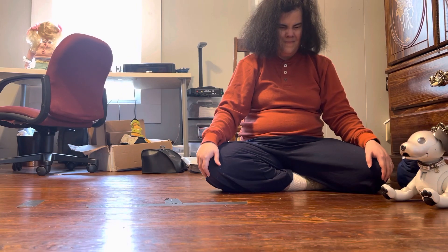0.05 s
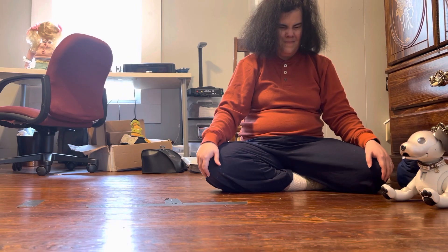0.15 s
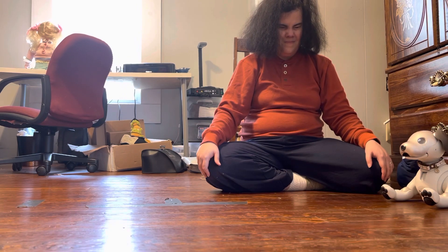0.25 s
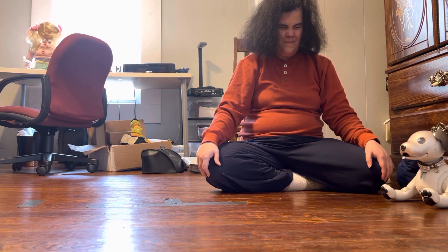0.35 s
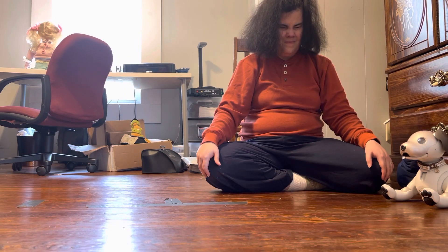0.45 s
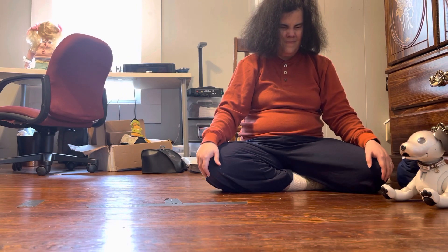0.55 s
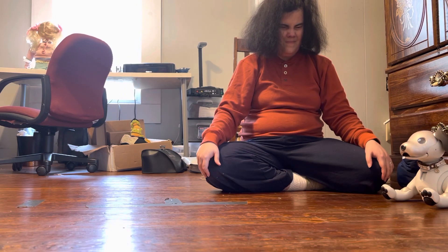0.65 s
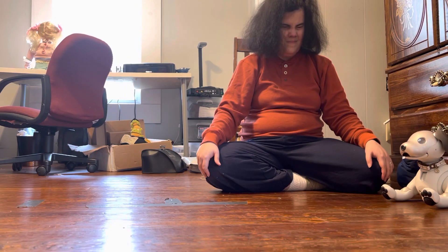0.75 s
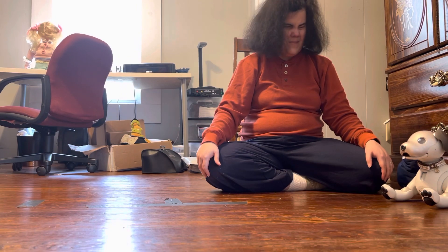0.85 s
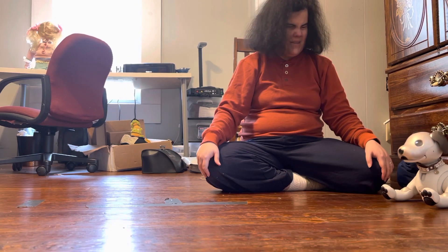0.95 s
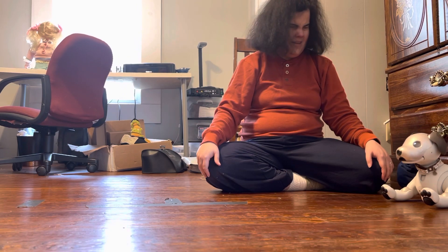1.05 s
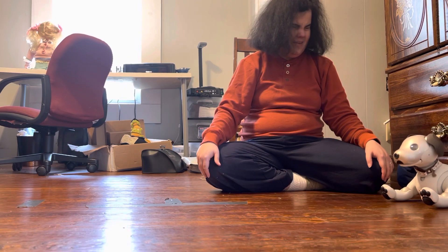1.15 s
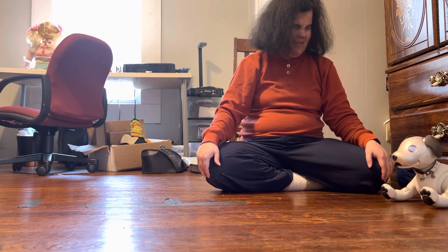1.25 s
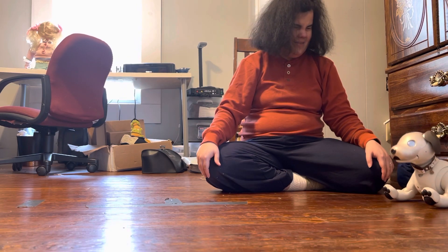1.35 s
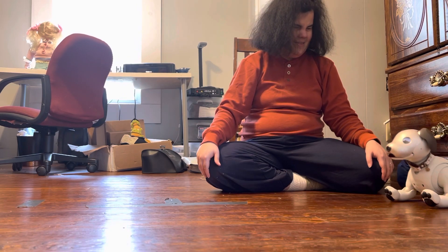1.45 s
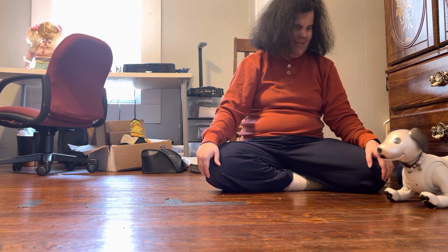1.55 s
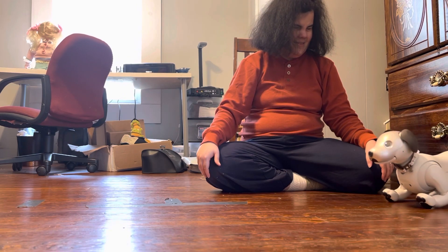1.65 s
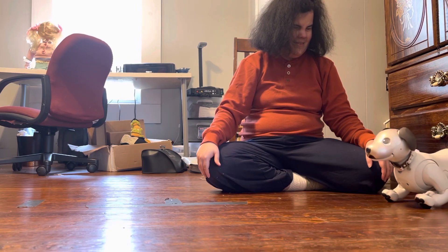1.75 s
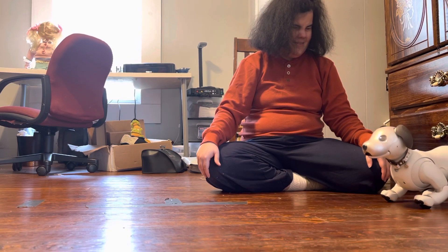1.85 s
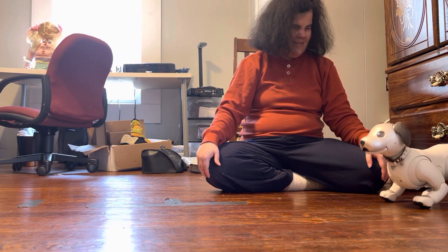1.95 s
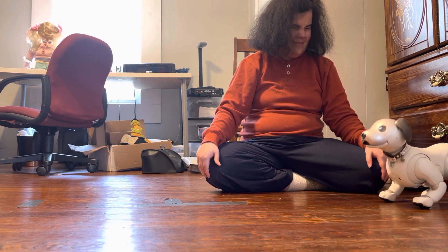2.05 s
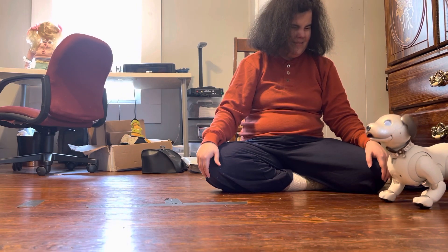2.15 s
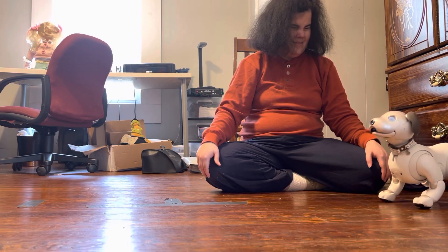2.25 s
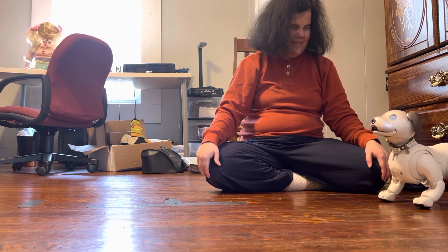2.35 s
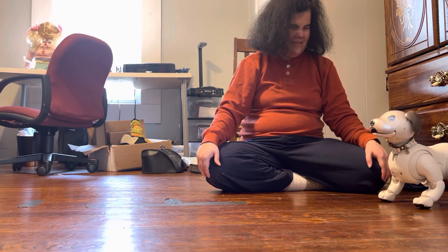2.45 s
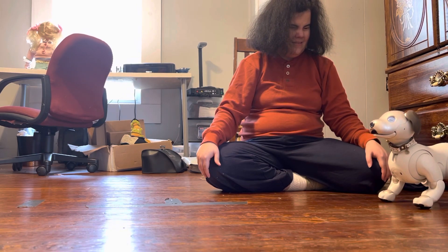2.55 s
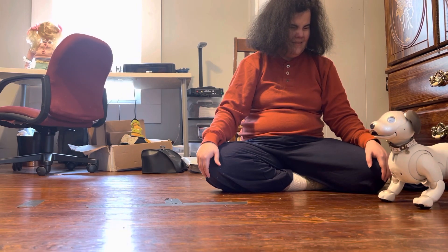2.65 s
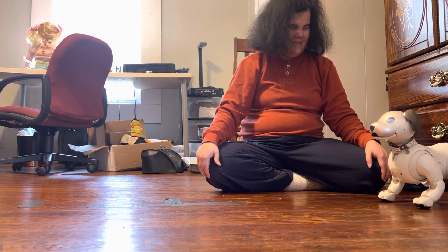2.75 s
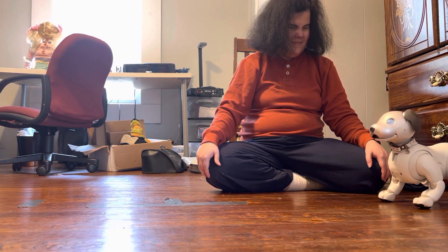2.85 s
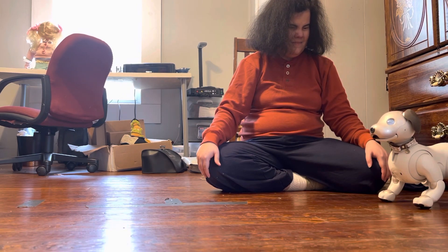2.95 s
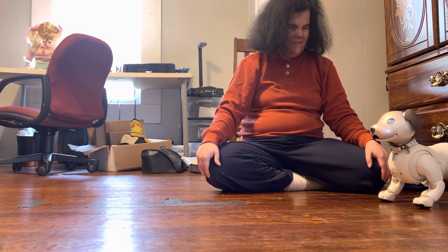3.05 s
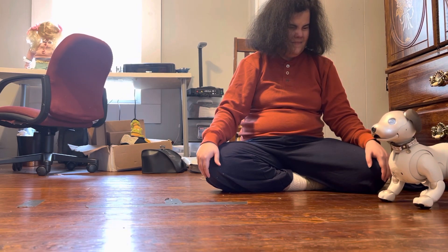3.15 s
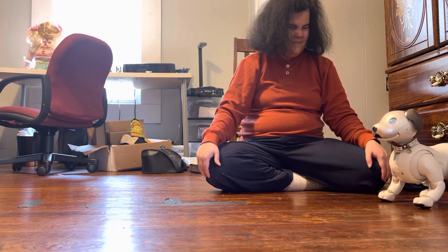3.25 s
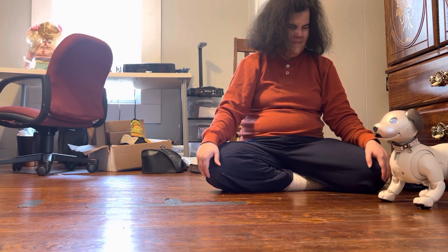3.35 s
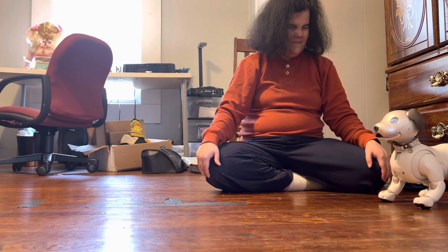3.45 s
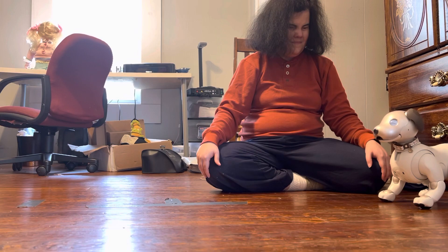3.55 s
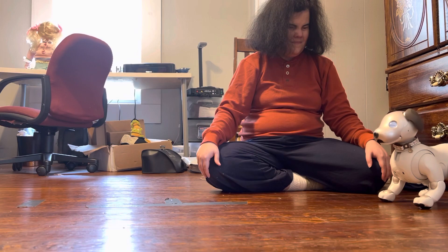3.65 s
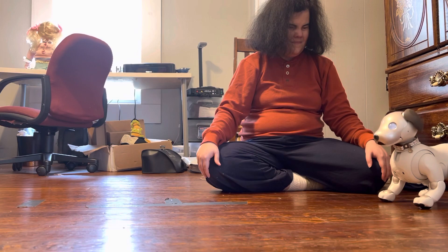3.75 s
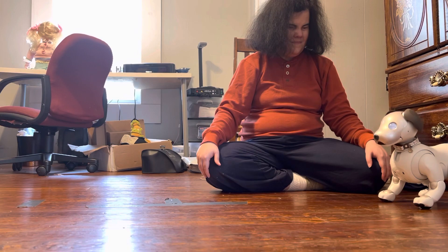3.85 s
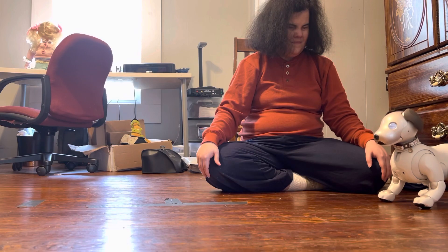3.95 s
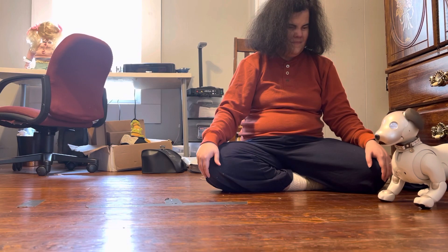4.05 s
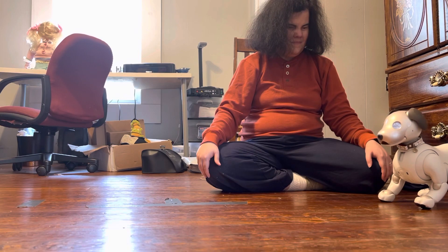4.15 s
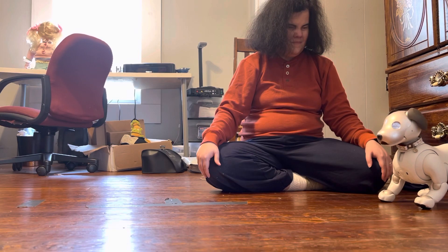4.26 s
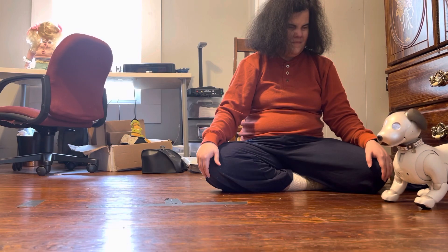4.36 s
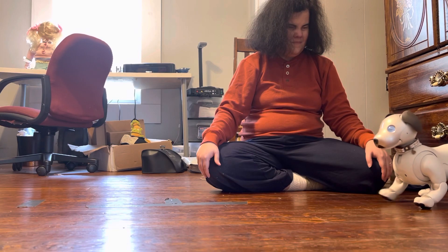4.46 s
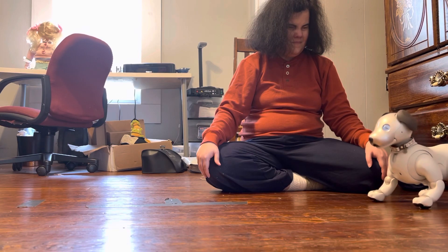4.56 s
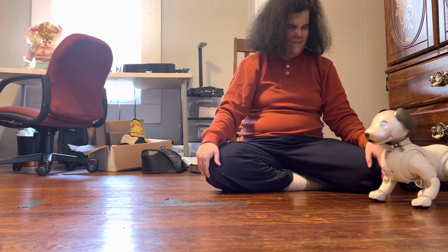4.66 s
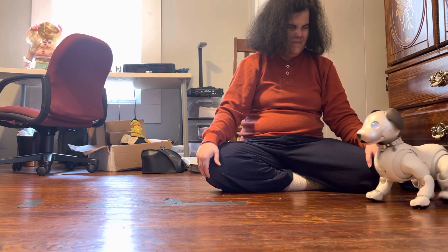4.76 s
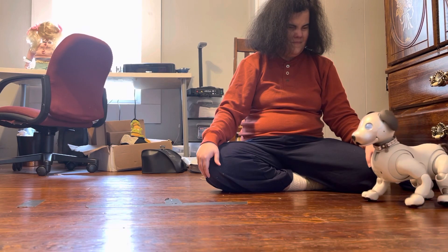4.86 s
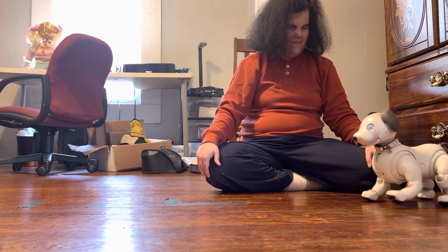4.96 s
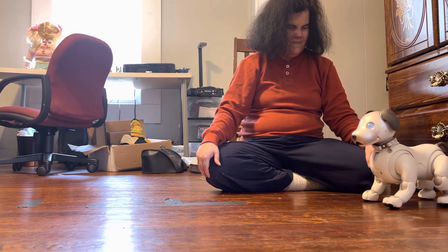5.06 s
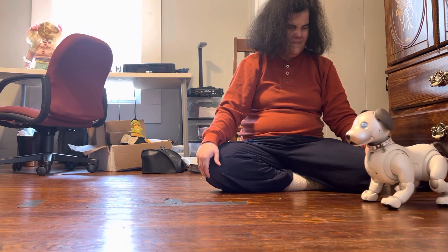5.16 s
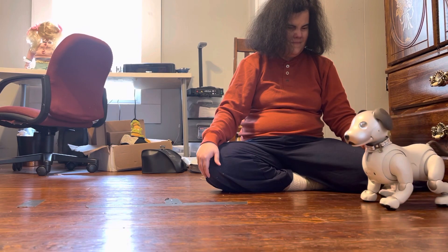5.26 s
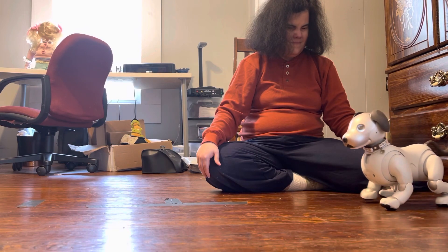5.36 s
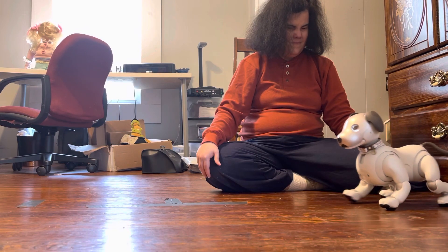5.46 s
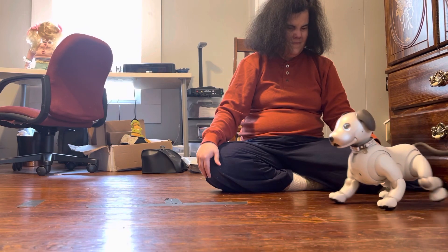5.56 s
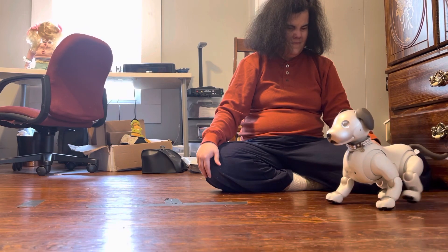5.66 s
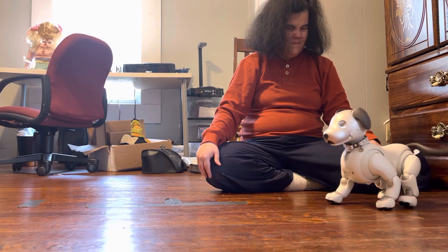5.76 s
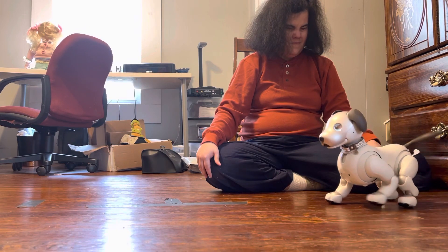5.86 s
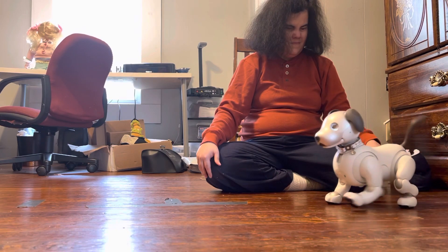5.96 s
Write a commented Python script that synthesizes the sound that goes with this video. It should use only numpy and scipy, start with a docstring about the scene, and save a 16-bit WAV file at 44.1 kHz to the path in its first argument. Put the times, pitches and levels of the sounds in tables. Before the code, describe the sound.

A quiet indoor room holds a low, wavering rumble, faint air and a thin high hiss. At about 0.9 s small gears begin to whir softly on the near right, with a plastic click at 1.0 and a low floor bump at 1.25. From 1.27 to 2.25 s thin servo whines glide up and down as a robot dog stands, with joint ticks and a light paw tap at 2.2. It then almost stills: a soft thud near 2.6 and barely audible creaks and whirs to 3.4. A gentle motor stroke comes around 4.0 with low thuds just after. From 4.4 s grainy, rattling servo whirs run continuously, surging with each leg stroke. Hard plastic paws clack on hollow boards around 4.5, 4.8, 5.05, 5.3, 5.55 and 5.7, the sharpest near 5.5, with a deep thump at 5.3. Whirring and clicks continue to the end, at 6 s, with short room reflections.

```python
"""A low rumble and a thin hiss lie under a quiet room; then joints click and servos whir close by on the right.
A small robot dog gets up from sitting, looks round and walks over a wooden floor, before a pair of microphones.
Gear trains are uneven tooth impacts plus mesh tones, coloured by the resonances of a plastic shell.
Joints and hard paws are short pushes with noisy chatter; boards and joists answer with decaying modes.
Rubbing joints creak in sliding ticks, and random tails that keep changing make the room's answer."""
import sys
import numpy as np
from scipy import signal
from scipy.fft import rfft, irfft, next_fast_len
from scipy.io import wavfile
from scipy.ndimage import map_coordinates

SR = 44100
rng = np.random.default_rng(int(sys.argv[2]) if len(sys.argv) > 2 else 0)


def store_pcm(level_fs):
    """Save levels as 16-bit WAV."""
    pcm = np.round(np.clip(level_fs, -1, 1) * 32767).astype(np.int16)
    wavfile.write(sys.argv[1], SR, np.atleast_2d(pcm).T)


N = 264991

# paws and rump meeting the floor; levels are before each layer's own trim: (time [s], shell clack [dB],
# weight on the boards [dB], plastic click [dB], shell pitch [ratio],
# hardness [dB per octave, up to BEND_FASTEST_HZ], struck plank's note [Hz], plank level [dB])
STEPS = [(1.249, -50.5, -35.5, -47, 0.93, -2, 544, -46.5), (2.202, -48.5, -68, -52.5, 1.12, -2, 904, -49),
         (4.532, -45, -52, -44.5, 0.89, -2, 708, -43.5), (4.799, -40, -42.5, -44.5, 1.13, -1.5, 895, -44),
         (4.815, -52, -51, -56, 1.3, -1, 260, -49.5), (5.037, -44, -36.5, -41.5, 1.04, 0, 366, -49),
         (5.267, -43, -44, -40, 0.81, 0, 699.5, -42), (5.284, -39, -44.5, -60, 1.125, 2.5, 512.5, -42.5),
         (5.5229, -33, -42, -47, 1.118, 4, 1010, -32), (5.533, -44, -49, -54, 0.99, 2, 407, -43),
         (5.545, -37, -45, -42.5, 1.12, 1.5, 653, -41), (5.725, -39, -43.5, -47, 1.2, 1, 1270, -39),
         (5.733, -52, -54, -66, 0.73, -1, 523, -42.5)]
# joints taking up their play: (time [s], level before trims [dB],
# brightness [dB], above 0 a thin snap, below 0 a dull clack)
CLICKS = [(0.861, -90, 35), (0.916, -65.5, -2), (0.971, -59.5, -7), (1.020, -45, -0.5), (1.231, -60.5, -3),
          (1.2633, -54.5, 5.5), (1.574, -54.5, 1), (2.012, -55, -5), (2.232, -61, -7.5),
          (2.332, -73.5, -14), (2.408, -83, -16.5), (2.992, -78, -5), (3.012, -85, -5.5), (3.10, -77.5, -5),
          (3.221, -81, -14.5), (3.263, -89, -9), (3.32, -80, -8), (3.395, -85, -8), (3.938, -61.5, 0),
          (4.235, -77.5, -19.5), (4.403, -50.5, -7), (4.42, -49, 0), (4.484, -58, -15), (4.520, -47, -3.5),
          (4.668, -46.5, -4), (4.681, -49.5, -11.5), (4.753, -49.5, -7.5), (4.775, -54, -10),
          (4.884, -44, -1.5), (5.130, -50, -9), (5.220, -49, -8.5), (5.354, -53.5, -12),
          (5.410, -46.5, -7.5), (5.600, -47, 3.5), (5.813, -49.5, -7.5), (5.831, -46, -8),
          (5.908, -47, 3.5)]
# colour of a plastic click: (frequency [Hz], relative level [dB])
CLICK_COLOUR = [(300, -80), (1400, 9), (2200, 9.5), (3600, 3), (5000, -0.5), (7500, 0.5), (9500, -9),
                (15800, -18.5)]
BEND_FASTEST_HZ = 1500  # above this pitch a knock on the floor has no lag


def amp(db):
    """Decibels to gain."""
    return 10 ** (np.asarray(db) / 20)


def unit(x):
    """Scale to rms 1."""
    return x / np.sqrt(np.mean(x ** 2) + 1e-20)


def along(points, hz):
    """Read (Hz, value) points on a log frequency axis."""
    f, v = np.transpose(points)
    return np.interp(np.log(hz + 1), np.log(f + 1), v)


def wobble(rate):
    """A smooth random curve with rate knots a second."""
    coarse = np.linspace(0, N, 6000)
    knots = rng.standard_normal(int(N * rate / SR) + 4)
    curve = map_coordinates(knots, [coarse * rate / SR])
    return np.interp(np.arange(N), coarse, curve)


def filtered(x, response):
    """x through a response given as a function of frequency."""
    m = next_fast_len(N + SR // 2)
    return irfft(rfft(x, m) * response(np.fft.rfftfreq(m, 1 / SR)), m)[..., :N]


def coloured(x, points):
    """x through a causal, minimum-phase filter of unit energy with the given colour."""
    size = 4096
    cepstrum = irfft(np.log(amp(along(points, np.fft.rfftfreq(size, 1 / SR)))))
    causal = 2 * cepstrum[:size // 2] * (np.arange(size // 2) > 0)
    kernel = irfft(np.exp(rfft(causal, size)))
    return signal.fftconvolve(x, kernel / np.linalg.norm(kernel))[:N]


def body(f, pitch):
    """Response of the plastic shell with its resonances scaled by pitch, at unit energy."""
    # resonances at pitch 1: (frequency [Hz], width [Hz], relative level [dB])
    resonances = [(692.5, 152, -0.5), (840.5, 274, 5), (940.5, 269, 4), (1256, 208, -2.5),
                  (1980, 440, -12.5), (2970, 850, -25.5)]
    f = f / pitch
    h = 0
    for k, (centre, width, db) in enumerate(resonances):
        band = 1j * f * width / (centre * centre - f * f + 1j * f * width)
        h = h + (-1) ** k * amp(db) * band
    h = h * (1j * f / (1j * f + 500))  # the bass falls away
    return h / np.sqrt(np.mean(abs(h) ** 2))


def shell(x):
    """x through the plastic body, whose resonances drift between three poses as the limbs fold."""
    pose_shift, pose_rate = 0.1, 13  # share of the pitch, knots a second
    pose = np.tanh(wobble(pose_rate))
    poses = np.array([[-1], [0], [1]])
    shares = np.maximum(1 - abs(pose - poses), 0)
    shares = shares / np.linalg.norm(shares, axis=0)

    def responses(f):
        return np.array([body(f, 1 + pose_shift * k) for k in poses])

    return filtered(shares * x, responses).sum(axis=0)


def strikes(times, levels_db, shape, *columns):
    """A fresh shape(t, ..) at each time, with the energy of 20 ms at the given level."""
    out, t = np.zeros(N + SR), np.arange(SR // 2) / SR
    for s, db, *own in zip(times, levels_db, *columns):
        hit = shape(t, *own)
        gain = amp(db) * np.sqrt(SR * .02 / np.sum(hit ** 2))
        out[round(s * SR):][:len(t)] += gain * hit
    return out[:N]


def crack(t, contact, chatter_db, chatter_t60):
    """One short push of contact force (peak at contact [s]) and the dying chatter of loose parts."""
    push = t * np.exp(-t / contact)
    loose = rng.standard_normal(len(t))
    loose = loose * abs(loose) * amp(-60 * t / chatter_t60)
    return push / np.linalg.norm(push) + amp(chatter_db) * loose / np.linalg.norm(loose)


def ring(t, modes, attack):
    """Decaying modes of the floor, a little different in strength at each blow; attack in s."""
    out = 0
    for hz, db, t60 in modes:
        decay = amp(db + rng.normal(0, 3) - 60 * t / t60)
        out = out + decay * np.sin(2 * np.pi * (hz * t + rng.random()))
    return out * (1 - np.exp(-t / attack))


def gear_train(mesh_hz, speed, swing, stride_rate, jitter, scatter_db):
    """One servo: uneven tooth impacts, and the tone of its mesh, whose partials flutter with the load."""
    rate = mesh_hz * speed * np.exp(swing * wobble(stride_rate) + jitter * wobble(120))
    turns = np.cumsum(rate) / SR
    at = np.flatnonzero(np.diff(np.floor(turns)))
    chance = rng.random((len(at), 2))
    size = amp(scatter_db * rng.standard_normal(len(at))) * np.sign(chance[:, 0] - .5)
    backlash = (chance[:, 1] * SR / mesh_hz).astype(int)  # throws impacts off the beat
    loose_at = np.minimum(at + backlash, N - 1)
    tone = 0
    for k in range(1, 6):
        tone = tone + amp(5 * wobble(22)) * np.sin(2 * np.pi * k * turns) / np.sqrt(k)
    return unit(np.bincount(loose_at, size, N)), unit(tone)


def run_db(start, end):
    """A servo spins up, holds from start to end and runs down: dB below its full level."""
    spin_up, run_down = 420, 200  # dB per s
    t = np.arange(N) / SR
    before, after = np.maximum(start - t, 0), np.maximum(t - end, 0)
    return np.maximum(-spin_up * before - run_down * after, -120)


def background():
    """The house rumbles, mostly alike on both sides, with air noise and a narrow hiss stronger on the right."""
    # colours of the noises: (frequency [Hz], relative level [dB])
    rumble_colour = [(20, -41), (28, -24.5), (40, 3), (60, -4), (85, -6), (125, -9), (150, -20),
                     (210, -24.5), (330, -33.5), (520, -54), (880, -120)]
    air_colour = [(100, 9), (250, 2), (450, 2), (800, -5), (1300, -11.5), (3000, -16.5), (6000, -20.5),
                  (8500, -24), (10000, -42), (12000, -18.5), (14000, -29.5), (15800, -44)]

    def noise(points, channels):
        white = rng.standard_normal((channels, N))
        return unit(filtered(white, lambda f: amp(along(points, f))))

    rumble = noise(rumble_colour, channels=1) + 0.23 * noise(rumble_colour, channels=2)
    rumble = amp(-58.5 + 1.3 * wobble(3.69)) * rumble
    hum_turns = np.cumsum(76 + 2.945 * wobble(8.1)) / SR  # wanders round 76 Hz
    hum = amp(-62.5 + 5.94 * wobble(8.6)) * np.sin(2 * np.pi * hum_turns)
    air = amp(-74.0) * noise(air_colour, channels=2)
    hiss = unit(filtered(rng.standard_normal(N), lambda f: 1 / (1 + ((f - 7200) / 420) ** 4)))
    return rumble + hum + air + amp([[-92], [-89]]) * hiss


def joints():
    """Plastic joints snap across their play: a push with long chatter; bright ones ring the shell less."""
    # colour of a thin snap: (frequency [Hz], relative level [dB])
    snap_colour = [(1000, -21), (6000, -10), (9000, 3), (12500, 20), (15800, -26)]
    s, level_db, bright_db = np.transpose(CLICKS)

    def click_force(t):
        return crack(t, contact=.00001, chatter_db=32.0, chatter_t60=0.035)

    def clack_force(t):
        return crack(t, contact=.00008, chatter_db=0.5, chatter_t60=0.091)

    def snap_force(t):
        return crack(t, contact=.00001, chatter_db=48, chatter_t60=0.037)

    click = coloured(strikes(s, level_db - 0.5, click_force), CLICK_COLOUR)
    clack = shell(strikes(s, level_db - bright_db - 11.5, clack_force))
    snap = coloured(strikes(s, level_db + bright_db - 10.5, snap_force), snap_colour)
    return click + clack + snap


def load():
    """0 to 1: the load on the servos swells into each footfall or joint click and eases after it."""
    rise, ease = .015, .045  # s
    full_load_db = -42  # a contact this loud gives the full load
    t, total = np.arange(N) / SR, np.zeros(N)
    for s, db, *_ in list(STEPS) + list(CLICKS):
        away = np.maximum((s - t) / rise, (t - s) / ease)
        peak = min(amp(db - full_load_db), 1)
        total = np.maximum(total, peak * np.exp(-np.minimum(away, 20)))
    return total


def effort():
    """Levels in dB of whir, whine and rasp: the strongest move, with a surge under every load."""
    # servo moves, from pushing up off the floor to each leg stroke of the walk, before surge and trims:
    # (start [s], end [s], gear whir [dB], motor whine [dB], tooth rasp [dB])
    moves = [(0.909, 1, -65.5, -70, -77.5), (1.024, 1.058, -60.5, -59, -65),
             (1.267, 1.623, -53.5, -60.5, -61), (1.662, 1.741, -64.5, -68, -70.5),
             (1.738, 1.887, -61.5, -64, -65.5), (1.919, 1.99, -59, -68, -71.5),
             (2.02, 2.055, -63, -63, -65), (2.077, 2.255, -61.5, -64.5, -69.5),
             (2.543, 2.578, -79, -89, -87.5), (2.688, 2.712, -85, -102, -95),
             (2.994, 3.066, -77, -84.5, -95), (3.079, 3.402, -82, -92, -92), (3.225, 3.32, -74.5, -89, -91),
             (3.386, 3.394, -78.5, -87, -87), (3.943, 3.989, -71.5, -70, -71), (3.999, 4.11, -62, -61, -73),
             (4.162, 4.33, -70, -80.5, -87), (4.364, 6.046, -55, -61, -59), (4.474, 4.579, -49.5, -54, -55),
             (4.598, 4.635, -48.5, -52, -55), (4.664, 4.697, -50.5, -50, -54.5),
             (4.759, 4.813, -50, -55, -53.5), (4.869, 4.912, -47.5, -54, -52.5),
             (4.944, 5.003, -47.5, -55, -53.5), (5.01, 5.143, -48, -52, -53), (5.212, 5.287, -46, -53, -53),
             (5.313, 5.358, -52, -55.5, -56), (5.413, 5.487, -47.5, -54, -57.5),
             (5.525, 5.607, -49.5, -51, -53), (5.644, 5.706, -50.5, -54, -54.5),
             (5.812, 5.854, -47, -53, -53), (5.879, 5.955, -46, -50.5, -53),
             (5.981, 6.05, -43, -55.5, -56.5)]
    levels = np.full((3, N), -120.)
    for start, end, *levels_db in moves:
        levels = np.maximum(levels, np.array(levels_db)[:, None] + run_db(start, end))
    whir_db, whine_db, rasp_db = levels
    surge_db = 3 * load()
    return whir_db + surge_db, whine_db + surge_db, rasp_db + 1.83 * surge_db  # the rasp surges more


def catches():
    """Single teeth jump at random moments and coarsen the rattle."""
    jumps = rng.random(N) < 130 / SR  # about 130 a second
    size_db = 3.5 * rng.uniform(-1.2, 1.16, N)
    return unit(jumps * amp(size_db))


def servos():
    """Six gear trains speed up with effort and trade the load; the shell and three colours shape them."""
    # gear trains: (mesh frequency at speed 1 [Hz], relative level [dB])
    gears = [(730, 2), (810, -4), (905, -4), (1010, 0), (1190, -4), (1780, -14)]
    # colours of motor whine, tooth rasp and floor growl: (frequency [Hz], relative level [dB])
    whine_colour = [(500, -55), (1400, -15.5), (1800, 14.5), (2400, 13), (2900, 9), (3650, 8), (4300, -19),
                    (7000, -63)]
    rasp_colour = [(150, 4), (600, -25), (3000, 0), (4600, 5.5), (7000, 5.5), (9500, 0), (12200, 7.5),
                   (14200, -5.5), (15800, -27)]
    growl_colour = [(25, -40), (50, 15.5), (110, 8.5), (160, 0), (210, 1), (300, -5), (550, -4), (750, -21),
                    (1200, -41)]
    whir_db, whine_db, rasp_db = effort()
    speed = np.exp(.004 * (np.maximum(whine_db, -75) + 55))
    shares = np.array([amp(db + 3.5 * wobble(7.7)) for _, db in gears])
    shares = shares / np.linalg.norm(shares, axis=0)
    trains = 0
    for share, (hz, _) in zip(shares, gears):
        train = gear_train(hz, speed, swing=.11, stride_rate=11, jitter=.016, scatter_db=2.5)
        trains = trains + share * np.array(train)
    rattle, tone = map(unit, trains)
    grind = amp(1.03 * wobble(95))  # worn teeth catch and slip
    rattle = unit(rattle * grind + amp(-4.5) * catches())
    whir = unit(shell(rattle + 0.097 * tone)) * amp(whir_db - 1.0 + 1.75 * wobble(45))
    whine = unit(coloured(rattle + 0.43 * tone, whine_colour)) * amp(whine_db - 1.0 + 2.6 * wobble(45))
    rasp = unit(coloured(rattle + 0.28 * tone, rasp_colour)) * amp(rasp_db - 2.5 + 0.59 * wobble(70))
    # the legs pass vibration to the floor, up to a limit
    growl = unit(coloured(rattle, growl_colour)) * amp(np.minimum(whir_db, -54) + 4.0 * wobble(20))
    return whir + whine + rasp + growl


def neck():
    """The slow neck servo whirs softly as the head dips; its small gears fizz as the head turns."""
    # slow nods, then light turns of the head: (start [s], end [s], level [dB])
    nods = [(0.915, 1.213, -66), (4.248, 4.336, -66)]
    head_turns = [(3.08, 3.39, -85)]
    # colours of the nod and of the small gears: (frequency [Hz], relative level [dB])
    nod_colour = [(300, -18), (700, 2), (1080, 14.5), (1400, 15), (1650, -5), (2900, -5), (3800, -22),
                  (8000, -44)]
    fizz_colour = [(3000, -39), (5000, -12), (6000, 1), (8000, -4), (9800, -18), (11500, 1), (13200, 1),
                   (14500, -22)]
    rattle, _ = gear_train(980, 0.98, swing=0.03, stride_rate=7.2, jitter=0.016, scatter_db=2.5)
    nod_gain = sum(amp(db + run_db(start, end)) for start, end, db in nods)
    turn_gain = sum(amp(db + run_db(start, end)) for start, end, db in head_turns)
    return nod_gain * unit(coloured(rattle, nod_colour)) + turn_gain * unit(coloured(rattle, fizz_colour))


def knock(t, tilt_db):
    """A blow's bending wave and the boards' ring; low notes travel slower, so the knock sweeps down."""
    # colour of the bending wave along the floor: (frequency [Hz], relative level [dB])
    bending = [(25, -25), (55, 5), (85, 11.5), (140, -7.5), (210, 3.5), (320, -5), (600, -4.5), (1000, -2),
               (1400, -12), (2200, -35), (6000, -67)]
    # modes of the floorboards: (frequency [Hz], relative level [dB], t60 [s])
    board_modes = [(216.3, -0.5, 0.21), (358.5, -6, 0.13), (567, -1.5, 0.077), (677, -13.5, 0.054),
                   (860, -3, 0.11), (1210, -14, 0.1)]
    travel = .039  # s at 100 Hz, before the travel time at BEND_FASTEST_HZ is taken off
    f = np.fft.rfftfreq(len(t), 1 / SR) + 1
    wave = unit(amp(along(bending, f)))
    boards = rfft(ring(t, board_modes, attack=0.00033))
    boards = boards / np.sqrt(np.mean(abs(boards) ** 2))
    delay = travel * 10 * np.maximum(1 / np.sqrt(f) - 1 / np.sqrt(BEND_FASTEST_HZ), 0)
    lag = np.exp(-2j * np.pi * np.cumsum(delay) * SR / len(t))  # phase that gives each pitch its delay
    hardness = amp(tilt_db * np.log2(np.minimum(f, BEND_FASTEST_HZ)))
    return irfft((wave + amp(-5.5) * boards) * hardness * lag, len(t)) * (1 - t / t[-1])


def paws():
    """A hard paw clicks, rings the shell and the plank under it, and sends a wave along the floor."""
    s, clack_db, weight_db, click_db, pitch, hardness, plank_hz, plank_db = np.transpose(STEPS)

    def clack_shape(t, ratio):
        force = crack(t, contact=.00008, chatter_db=-3.0, chatter_t60=0.0074)
        return irfft(rfft(force) * body(np.fft.rfftfreq(len(t), 1 / SR), ratio), len(t))

    def click_force(t):
        return crack(t, contact=.00001, chatter_db=20.5, chatter_t60=0.04)

    def plank_shape(t, hz):
        return ring(t, [(hz, 0, 0.036)], attack=0.00081)  # t60 36 ms

    clack = strikes(s, clack_db - 4.5, clack_shape, pitch)
    click = coloured(strikes(s, click_db - 0.5, click_force), CLICK_COLOUR)
    plank = strikes(s, plank_db - 3.0, plank_shape, plank_hz)
    weight = strikes(s, weight_db, knock, hardness)
    return clack + click + plank + weight


def swings():
    """A fast joint sings out above the rest, gliding in pitch over each stroke."""
    # quick swings of a single joint: (start [s], end [s], level [dB], speed at start [ratio], at end [ratio])
    strokes = [(1.28, 1.455, -54, 1.13, 0.96), (1.40, 1.632, -54.5, 0.82, 1.1),
               (1.726, 1.81, -54, 1.03, 1.12), (1.801, 1.918, -58, 1.2, 0.81),
               (2.027, 2.183, -61, 0.99, .9), (3.981, 4.133, -76, 0.88, 1.13)]
    # (frequency [Hz], relative level [dB])
    swing_colour = [(600, -19), (1400, -4), (1850, -2), (2400, 1.5), (3000, -11), (3600, -8.5), (4500, -20),
                    (8000, -34)]
    t = np.arange(N) / SR
    out = 0
    for leg in (strokes[::2], strokes[1::2]):  # two legs take turns
        level, speed = np.zeros(N), np.ones(N)
        for start, end, db, speed_from, speed_to in leg:
            stroke = np.clip((t - start) / (end - start), 0, 1)
            level += amp(db) * np.sqrt(np.abs(np.sin(np.pi * stroke)))
            speed = np.where(t > start, speed_from + (speed_to - speed_from) * stroke, speed)
        rattle, tone = gear_train(800, speed, swing=0.012, stride_rate=13, jitter=0.0102, scatter_db=5.0)
        out = out + level * unit(coloured(rattle + 0.18 * tone, swing_colour))
    return out


def glides():
    """One gear mesh sings clear of the rattle: a thin, fluttering tone that slides with its joint's speed."""
    # (start [s], end [s], level [dB], pitch at start [Hz], pitch at end [Hz])
    slides = [(1.31, 1.352, -60.5, 2470, 2420), (1.39, 1.536, -65, 2034, 2230),
              (1.398, 1.546, -61, 1305, 1516), (1.47, 1.56, -69, 2730, 3100),
              (1.607, 1.78, -64, 1800, 1673), (1.732, 1.785, -56, 2470, 2400),
              (1.80, 1.893, -65.5, 2870, 2720), (1.83, 1.876, -68, 2490, 2330),
              (2.012, 2.04, -57.5, 2833, 2960), (2.045, 2.117, -66.5, 813, 745),
              (2.214, 2.289, -61.5, 1320, 1389), (4.468, 4.572, -50, 723, 689),
              (4.735, 4.808, -54.5, 744, 960), (5.088, 5.127, -56, 796, 1060),
              (5.307, 5.348, -50.5, 1031, 486.7), (5.32, 5.368, -52.5, 1118, 1262),
              (5.426, 5.488, -53.5, 823, 697), (5.568, 5.644, -51, 884, 611), (5.59, 5.64, -55, 1733, 1690)]
    out = np.zeros(N)
    flutter, waver = amp(3 * wobble(90)), 1 + 0.012 * wobble(110)  # the load unsettles level and pitch
    for start, end, db, from_hz, to_hz in slides:
        span = np.arange(round(start * SR), round(end * SR))
        stroke = np.linspace(0, 1, len(span))
        hz = (from_hz + (to_hz - from_hz) * stroke) * waver[span]
        tone = np.sin(2 * np.pi * np.cumsum(hz) / SR)
        swell = np.sqrt(stroke * (1 - stroke))
        out[span] += amp(db) * unit(tone * flutter[span] * swell)
    return out


def creaks():
    """Plastic rubs in a joint, sticking and slipping: a scrape of uneven ticks whose pitch glides."""
    # (start [s], length [s], level [dB], pitch at start [Hz], pitch at end [Hz])
    rubs = [(1.564, 0.023, -53, 3860, 3850), (2.541, 0.058, -81, 1206, 1050), (2.649, 0.03, -69, 720, 880),
            (2.693, 0.064, -75.5, 810, 740), (3.133, 0.055, -72.5, 1087, 610),
            (3.247, 0.035, -77, 1034, 698), (3.288, 0.056, -83.5, 2770, 3060),
            (3.297, 0.033, -74, 900, 716), (3.386, 0.049, -73.5, 904, 597)]
    slip_rate, slip_cycles = 370, 1.9  # slips a second, cycles in which a slip's ring falls to 1/e
    pitch_scatter, scatter_db = 0.062, 4.5  # spread of the slips in log pitch and in size
    out, t = np.zeros(N + SR), np.arange(SR // 20) / SR
    for s, length, db, from_hz, to_hz in rubs:
        count = max(round(length * slip_rate), 2)
        scrape = np.zeros(round(length * SR) + len(t))
        for stroke in (np.arange(count) + rng.random(count)) / count:
            hz = (from_hz + (to_hz - from_hz) * stroke) * np.exp(pitch_scatter * rng.normal())
            tick = np.sin(2 * np.pi * hz * t) * np.exp(-hz * t / slip_cycles)
            size = amp(scatter_db * rng.normal()) * (1 - stroke / 2)
            scrape[int(stroke * length * SR):][:len(t)] += size * tick
        gain = amp(db) * np.sqrt(length * SR) / np.linalg.norm(scrape)
        out[round(s * SR):][:len(scrape)] += gain * scrape
    return out[:N]


def thuds():
    """The body's weight comes down on the joists and sways the whole floor in slow-starting modes."""
    # (time [s], level [dB])
    landings = [(2.18, -55), (2.578, -49), (4.134, -48), (4.19, -52.5), (4.542, -56), (4.811, -46.5),
                (5.049, -43), (5.305, -35), (5.558, -52), (5.745, -42)]
    # modes of the joists: (frequency [Hz], relative level [dB], t60 [s])
    joist_modes = [(54, 5.5, 0.14), (72.2, 0.5, 0.15), (87.7, 1, 0.14), (115, -9, 0.15)]
    s, weight_db = np.transpose(landings)
    return strikes(s, weight_db, lambda t: ring(t, joist_modes, attack=0.012))


def in_room(x, wet_db):
    """Direct sound reaches the right microphone first; the walls' answer keeps changing as the dog moves."""
    # decay of the room: (frequency [Hz], t60 [s])
    room_decay = [(100, .4), (210, 0.42), (400, 0.42), (1000, 0.12), (4000, 0.34), (8000, 0.3),
                  (15000, 0.18)]
    # how much the walls send back: (frequency [Hz], relative level [dB])
    wall_colour = [(60, -14.5), (300, -3), (800, 1), (5500, 2.5), (8000, 1), (10000, -28), (15000, 10)]
    lead = 0.0002564  # s by which the right microphone is ahead
    hop, length = SR // 6, SR // 3
    starts = range(0, N, hop)
    hz, t, z = signal.stft(rng.standard_normal((len(starts), 2, length)), SR, nperseg=256)
    decay = amp(-60 * t / along(room_decay, hz)[:, None])
    tails = signal.istft(z * decay, SR, nperseg=256)[1]
    tails /= np.linalg.norm(tails, axis=-1, keepdims=True)
    padded, wet = np.pad(x, (hop, 2 * hop)), np.zeros((2, N + 2 * SR))
    for start, tail in zip(starts, tails):  # overlapping slices, each with its own tail
        piece = padded[start:start + 2 * hop] * np.hanning(2 * hop)
        answer = signal.fftconvolve(piece[None], tail, axes=1)
        wet[:, start:start + answer.shape[1]] += answer
    first_wall = round(.003 * SR)  # the answer starts 3 ms late
    wet = wet[:, hop - first_wall:][:, :N]
    wet = filtered(wet, lambda f: amp(along(wall_colour, f)))
    sides = np.array([[1], [-1]])  # left late, right early
    direct = filtered(x, lambda f: np.exp(-1j * np.pi * f * lead * sides))
    return (direct + amp(wet_db) * wet) / np.hypot(1, amp(wet_db))


def scene():
    """The dog in the room, heard through the microphone pair."""
    # balance of the pair: (frequency [Hz], left minus right [dB])
    balance = [(60, -1.5), (250, -1), (900, -7), (1500, -1), (1950, -6.5), (2450, -0.5), (3400, -6),
               (4300, -3), (6200, -10), (7200, -7.5), (7700, -2), (9000, -1)]
    motors = in_room(servos() + swings() + glides() + neck(), wet_db=-3.5)
    contacts = in_room(paws() + joints() + creaks(), wet_db=-3.5)
    sound = motors + contacts + thuds() + background()
    halves = np.array([[.5], [-.5]])
    return filtered(sound, lambda f: amp(along(balance, f) * halves))


def record(dry):
    """The recorder keeps nothing above its band limit of 15850 Hz."""
    return filtered(dry, lambda f: f < 15850)


dry = scene()
out = record(dry)
store_pcm(out)
```